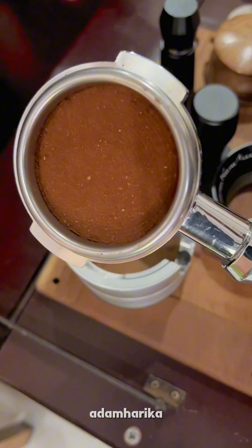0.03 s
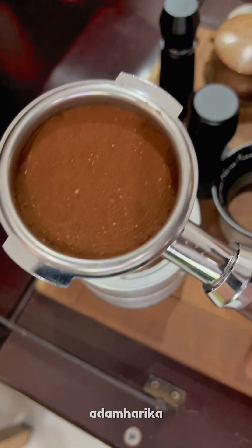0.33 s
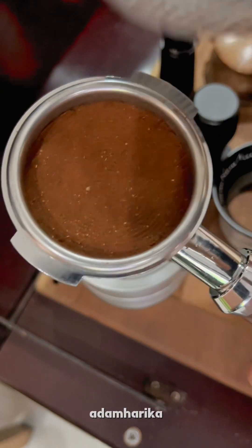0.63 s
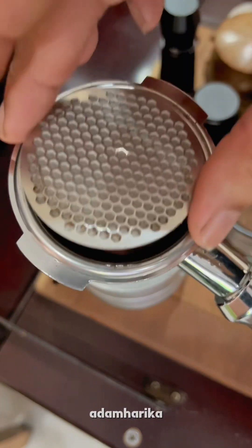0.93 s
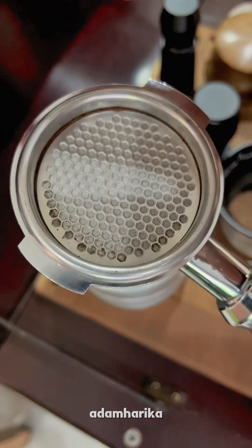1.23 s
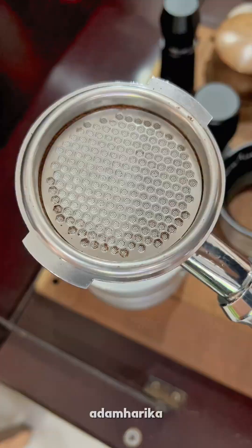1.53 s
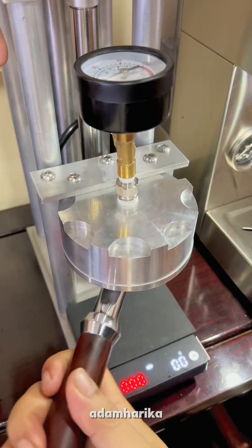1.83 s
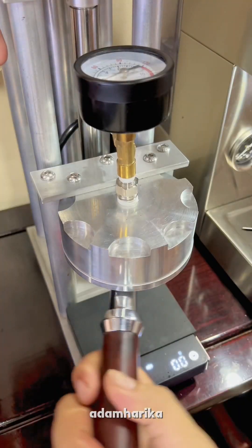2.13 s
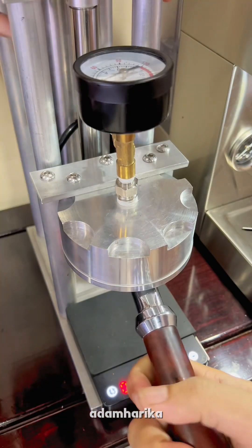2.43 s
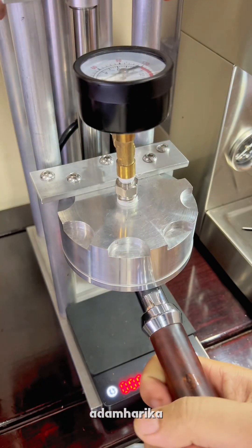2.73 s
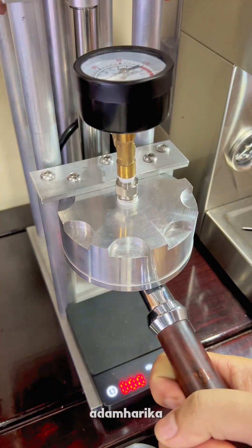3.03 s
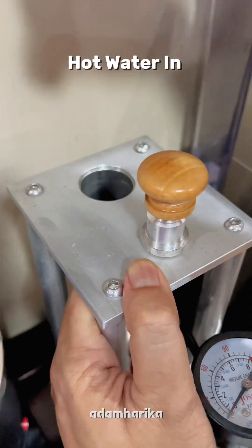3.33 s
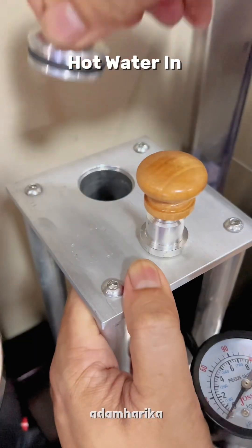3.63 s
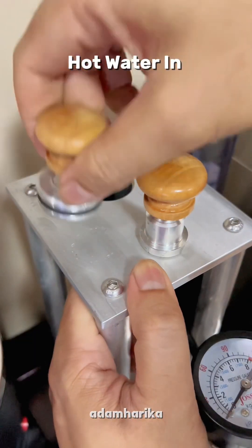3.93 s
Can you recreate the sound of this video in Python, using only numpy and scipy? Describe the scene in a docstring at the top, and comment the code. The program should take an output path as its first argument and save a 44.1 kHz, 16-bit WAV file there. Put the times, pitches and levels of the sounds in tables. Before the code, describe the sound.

A steel portafilter clanks and scrapes as it locks into an espresso press. Before it, a thin metal screen rattles briefly; afterwards a plug pops out and clinks down. Heard close in a small, quiet room with hissing water.

```python
"""A portafilter is knocked into the group head of an espresso press and twisted tight: steel lugs
scrape and clank, the heavy frame rings, the rubber gasket rubs and groans. Before that, a steel
puck screen drops into the basket and rattles to rest. Afterwards a plug pops out of the water
chamber and clinks on the top plate. Hands rub faintly on the parts, and heating water hisses
and sings over the low rumble of a small, quiet room."""
import sys
import numpy as np
from scipy import signal
from scipy.fft import rfft, irfft
from scipy.io import wavfile
from scipy.ndimage import uniform_filter1d

SR = 44100
rng = np.random.default_rng(int(sys.argv[2]) if len(sys.argv) > 2 else 0)


def dump_mix(stems):
    """Bounce the given channels to the path in sys.argv[1] as a 16-bit WAV at rate SR."""
    frames = np.atleast_2d(stems).T  # one column per channel
    limited = np.clip(frames, -1, 1)  # hard clip at full scale
    pcm = np.round(limited * 32767).astype(np.int16)
    wavfile.write(sys.argv[1], SR, pcm)


N = 176400
T = np.arange(SR // 2) / SR  # time within one hit, s
SCENE_T = np.arange(N) / SR


def amp(db):
    """Decibels to gain."""
    return 10 ** (np.asarray(db) / 20)


def unit_rms(x):
    """Scales to rms 1."""
    return x / np.sqrt(np.mean(x ** 2) + 1e-20)


def curve_at(points, hz):
    """Reads a curve on a log-frequency axis."""
    f, value = np.transpose(points)
    return np.interp(np.log(hz + 1), np.log(f), value)


def add(mix, start_s, sound):
    """Lays a sound into the stereo mix."""
    part = mix[:, max(round(start_s * SR), 0):][:, :sound.shape[-1]]
    part += sound[..., :part.shape[1]]


def rise(seconds):
    """A smooth attack."""
    return np.sin(np.pi / 2 * np.minimum(T / seconds, 1)) ** 2


def resonance(hz, db, t60):
    """One decaying mode."""
    return amp(db - 60 * T / t60) * np.sin(2 * np.pi * hz * T)


def stereo_noise(size, correlation):
    """Frequencies and spectrum of white noise, partly alike in both ears."""
    hz = np.fft.rfftfreq(size, 1 / SR)
    mid, side = rfft(rng.standard_normal((2, size)))
    alike = np.clip(curve_at(correlation, hz), 0, 1)
    mid, side = mid * np.sqrt((1 + alike) / 2), side * np.sqrt((1 - alike) / 2)
    return hz, np.array([mid + side, mid - side])


# stereo image of the hits: f/Hz, left-right correlation/0-1
HIT_IMAGE = [(300, 1), (700, 0.3), (1300, 1), (3000, 0.8), (8000, 0.81), (14000, .42)]

def dense_modes(bands, hold_s=0, tilt_db=0):
    """Countless close modes as noise: each band holds during contact, then dies at its own speed."""
    hz, spectrum = stereo_noise(len(T), HIT_IMAGE)
    octaves = np.log2((hz + 100) / 4000)
    spectrum *= amp(curve_at([band[:2] for band in bands], hz) + tilt_db * octaves)
    spectrum *= np.minimum(hz / bands[0][0], 1) / np.maximum(hz / bands[-1][0], 1) ** 2  # roll-offs
    out = 0
    for k, (_, _, t60) in enumerate(bands):
        share = curve_at([(band[0], j == k) for j, band in enumerate(bands)], hz)
        decay = amp(-60 * np.maximum(T - hold_s, 0) / t60)
        out += irfft(spectrum * share, len(T)) * decay
    return out


def ring(modes, tilt_db=0, damping=1):
    """Clear modes, widened by a phase offset between the ears; damping divides their decay times."""
    hz, db, t60 = np.transpose(modes)[:, :, None]
    sign = (-1) ** np.arange(len(modes))[:, None]
    spread = np.arccos(np.clip(curve_at(HIT_IMAGE, hz), 0, 1)) * sign / 2
    octaves = np.log2(hz / np.median(hz))
    envelope = sign * amp(db + tilt_db * octaves - 60 * T * damping / t60)
    return np.array([(envelope * np.sin(2 * np.pi * hz * T + ear * spread)).sum(0) for ear in (-1, 1)])


def grit(rough_db=2.0, grain_samples=30):
    """The flickering gain of surfaces that catch and slip."""
    flicker = unit_rms(uniform_filter1d(rng.standard_normal(len(T)), grain_samples))
    return unit_rms(amp(rough_db * flicker))


# stereo image of the ambience: f/Hz, left-right correlation/0-1
AIR_IMAGE = [(150, 1), (500, 0.7), (1500, 0.4), (5000, 0.5), (14000, 1)]
# ambience colour at the counter, at the press and by the water: f/Hz, relative level/dB
COUNTER_AIR = [(20, -37), (32, -15), (52, 2), (76, -8.5), (110, -4.5), (300, -15.5), (575, -19),
               (1200, -24), (2300, -28), (4000, -38), (8000, -46.5), (16000, -61.5)]
PRESS_AIR = [(20, -31), (35, -5.5), (65, 0), (150, -9.5), (260, -21), (450, -18.5), (850, -27.5),
             (1300, -31), (2000, -28), (2800, -27.5), (3650, -19), (4300, -28.5), (5500, -26.5),
             (7300, -35.5), (11000, -51), (16000, -75)]
WATER_AIR = [(20, -28), (32, -13), (55, 3), (180, -5.5), (320, -12), (650, -14.5), (1050, -21), (1550, -18),
             (2050, -18.5), (2220, -14), (2400, -28), (3100, -23.5), (3700, -19.5), (4400, -20),
             (4650, -15.5), (4950, -22.5), (6000, -20.5), (8200, -19.5), (9600, -24), (11500, -26),
             (12700, -32), (16000, -35)]

def background():
    """A bed of room rumble and heating-water hiss that steps up in level and changes colour twice."""
    out = np.zeros((2, N))
    beds = (0, 1.57, -52, COUNTER_AIR), (1.57, 3.033, -46, PRESS_AIR), (3.033, 4, -41.5, WATER_AIR)
    for start_s, end_s, db, colour in beds:
        hz, spectrum = stereo_noise(N, AIR_IMAGE)
        bed = unit_rms(irfft(spectrum * amp(curve_at(colour, hz)), N))
        out += amp(db) * bed * ((SCENE_T >= start_s) & (SCENE_T < end_s))
    return out


# breathy whistle of the water: t/s, f/Hz, level/dB
WATER_SONG = [(1.572, 3520, -55), (2.4, 3760, -57.5), (3.022, 3700, -62), (3.041, 2700, -49),
              (3.219, 2620, -50), (3.37, 2900, -46), (3.58, 2740, -46), (3.78, 2870, -48), (4, 2900, -46)]

def singing_water(pole_width_hz=350):
    """Heating water sings: hiss in one narrow, wandering resonance."""
    times, hz, db = np.transpose(WATER_SONG)
    hiss = irfft(stereo_noise(N, AIR_IMAGE)[1], N)
    pole = np.exp(-np.pi * pole_width_hz / SR)
    carrier = np.exp(2j * np.pi * np.cumsum(np.interp(SCENE_T, times, hz)) / SR)
    # shift down, low-pass, shift back: a gliding band-pass
    baseband = signal.lfilter([1], np.poly([pole, pole]), hiss / carrier)
    whistle = unit_rms((carrier * baseband).real)
    return whistle * amp(np.interp(SCENE_T, times, db)) * (SCENE_T >= times[0])


# reverb bands: f/Hz, level/dB, t60/s
ROOM_TAIL = [(119.7, -38, 0.47), (350, -10, 0.26), (1000, -9, 0.32), (3000, -11, 0.48), (7000, -12.5, 0.49),
             (11000, -9.5, 0.26), (14400, -12.5, 0.27)]

def room(x, build_up_s=0.0061):
    """A small room's diffuse tail; each band is scaled so that a longer decay adds no energy."""
    bands = [(hz, db + 10 * np.log10(2 * np.log(1000) / (t60 * SR)), t60) for hz, db, t60 in ROOM_TAIL]
    return signal.fftconvolve(x, dense_modes(bands) * rise(build_up_s), axes=1)[:, :N]


# bright steel scrape and deep frame thud, shared with later hits: f/Hz, level/dB per Hz, t60/s
STEEL_SCRAPE = [(1514, -24, 0.047), (2900, -23.5, 0.043), (3700, -16.5, 0.043), (4480, -23, 0.036),
                (5700, -19.5, 0.067), (7720, -27.5, 0.087), (10500, -30.5, 0.075), (15500, -35, 0.094)]
FRAME_THUD = [(65, -30, .08), (130, 6, 0.083), (242, 7, 0.11), (386, -3, 0.11), (697, -1, 0.15),
              (1090, -20, 0.085), (2500, -66, .03)]
# light rubs: t/s, hold/s, level/dB, tilt/dB per octave
HAND_RUBS = [(0.06, 0.028, -44.5, 5), (0.7, 0.062, -42, 4.5), (.766, .097, -48.5, 4),
             (1.57, 0.087, -26.5, -6.5), (1.654, 0.015, -23.5, 5.5), (2.565, 0.054, -25.5, 1),
             (2.884, 0.137, -26.5, -3.5)]
# soft bumps: t/s, level/dB
HAND_BUMPS = [(1.289, -26.5), (2.915, -22)]

def hands(attack_s=0.016):
    """Hands rub and bump faintly on the parts they hold."""
    out = np.zeros((2, N))
    for t, hold_s, db, tilt_db in HAND_RUBS:
        add(out, t, rise(attack_s) * amp(db) * dense_modes(STEEL_SCRAPE, hold_s, tilt_db))
    for t, db in HAND_BUMPS:
        add(out, t, rise(attack_s) * amp(db) * dense_modes(FRAME_THUD))
    return out


# hollow pop of the chamber air: f/Hz, level/dB, t60/s
CHAMBER_MODES = [(62.4, -26.5, 0.18), (117, -5.5, 0.067), (177.4, -24.5, 0.36), (247, 11.5, 0.024),
                 (277, -26, 0.35), (353, -10, 0.27)]
# wet blips: t/s, f/Hz, level/dB, t60/s
WET_BLIPS = [(3.3422, 523, -5, 0.011), (3.3679, 500, -20.5, 0.036)]

def chamber(pop_s=3.1605, pop_attack_s=0.0067, blip_attack_s=0.0027):
    """The seal lets go and the air in the water chamber rings; two wet blips follow."""
    out = np.zeros((2, N))
    add(out, pop_s, rise(pop_attack_s) * sum(resonance(*mode) for mode in CHAMBER_MODES))
    for t, hz, db, t60 in WET_BLIPS:
        add(out, t, rise(blip_attack_s) * resonance(hz, db, t60))
    return out


# ring of the plug and of the top plate: f/Hz, level/dB, t60/s
PLUG_MODES = [(894, -42, .25), (1297, -25, 0.091), (1940, -34.5, 0.15), (2710, -41.5, .11),
              (3063, -33, 0.07), (5240, -37, 0.08), (5604, -42, .09), (6310, -20, 0.03), (7470, -27, .052),
              (8450, -19, .02), (11440, -34, 0.063)]
PLATE_MODES = [(1295, -31, .13), (2013, -28.5, 0.18), (3106, -31, 0.14), (3456, -40, 0.14),
               (3964, -13.5, 0.026), (4130, -32, 0.18), (4500, -16.5, .035), (4575, -25, 0.089),
               (5400, -18, 0.052), (5435, -15, 0.067), (5620, -24, 0.098), (7440, -30, .08),
               (9981, -33, 0.062)]
# the plate's sharp transient: f/Hz, level/dB per Hz, t60/s
PLATE_CRACK = [(710, -21, 0.093), (1370, -13, 0.052), (2820, -17, 0.085), (4300, -9, 0.024),
               (5200, -5.5, 0.032), (5940, -7, 0.019), (7300, -11, 0.042), (8500, -11, 0.017),
               (9160, -13.5, 0.028), (11410, -13, 0.026), (12900, -24, 0.025), (15500, -26, .025)]
# plug on plate: t/s, crack/dB, crack tilt/dB per octave, plug ring/dB, plate ring/dB, thud/dB
PLUG_HITS = [(3.1540, -6, 5, 3, -20, -26), (3.1580, -8, -7.5, -9.5, -26, -32),
             (3.9318, 4, 1.3, -18, 1, -22), (3.9365, -10, 1, -27, -14, -15),
             (3.942, -11, -5.5, -28, -22, -12.5), (3.955, -13, -3, -30, -24, -18)]

def plug(attack_s=0.00069, thud_attack_s=0.0083):
    """The plug clicks free and is set back on the top plate; both ring over a thud of the frame."""
    out = np.zeros((2, N))
    for t, crack_db, tilt_db, plug_db, plate_db, thud_db in PLUG_HITS:
        crack = amp(crack_db) * dense_modes(PLATE_CRACK, tilt_db=tilt_db)
        clink = amp(plug_db) * ring(PLUG_MODES) + amp(plate_db) * ring(PLATE_MODES)
        add(out, t, rise(attack_s) * (crack + clink))
        add(out, t, rise(thud_attack_s) * amp(thud_db) * dense_modes(FRAME_THUD))
    return out


# thin ring of screen and basket: f/Hz, level/dB, t60/s
SCREEN_MODES = [(1201, -44, 0.29), (1780, -42.5, 0.17), (2330, -36, 0.049), (2650, -26, .05),
                (4070, -28, .03), (4264, -44.5, .2), (5070, -42.5, .13), (6030, -26.5, 0.071),
                (5960, -26.5, .045), (6550, -24, .045), (7876, -44.5, .17), (8720, -26.5, .055),
                (10100, -41.5, .13), (11100, -30, 0.14), (15139, -32, .12), (15600, -35, .12)]
# the screen's crisp transient, and a dull clank shared with the head: f/Hz, level/dB per Hz, t60/s
SCREEN_CRACK = [(500, -39, 0.015), (1590, -24, 0.023), (2400, -10, .035), (3030, -19.5, 0.019),
                (3850, -7.5, 0.026), (5330, -14.5, .02), (6300, -3.5, 0.03), (7340, -15.5, 0.024),
                (8700, -16.5, .028), (11000, -11, 0.017), (13000, -17.5, .022), (15500, -14, .02)]
STEEL_CLANK = [(298, -6, 0.11), (694, -5, 0.037), (1150, -5.5, 0.037), (2260, -12, 0.06),
               (2950, -16.5, 0.043), (6020, -51, 0.026)]
# bounces in the basket: t/s, crack/dB, ring/dB, clank/dB
SCREEN_HITS = [(1.0478, -3.5, -3.5, -49), (1.0595, 7, -0.5, -23.5), (1.0634, -1, -1, -39),
               (1.0674, -8, -10.5, -36), (1.073, -14.5, -16, -16.5), (1.1096, -16, -22, -42),
               (1.121, -23, -30, -20.5)]

def puck_screen(attack_s=0.0016):
    """The steel screen hits the rim, lands and rattles to rest on the coffee."""
    out = np.zeros((2, N))
    for t, crack_db, ring_db, clank_db in SCREEN_HITS:
        crack = amp(crack_db) * dense_modes(SCREEN_CRACK)
        clink = amp(ring_db) * ring(SCREEN_MODES)
        clank = amp(clank_db) * dense_modes(STEEL_CLANK)
        add(out, t, rise(attack_s) * (crack + clink + clank))
    return out


# low, uneven rubs as the handle turns: t/s, hold/s, level/dB
GASKET_RUBS = [(1.904, 0.055, -25.5), (2.054, 0.082, -30.5), (2.174, 0.09, -28.5)]
# rubber groan: t/s, f/Hz, fundamental/dB, octave/dB
GASKET_GROAN = [(2.27, 227, -60, -69), (2.305, 223.3, -42, -39), (2.355, 215.5, -44.5, -52.5),
                (2.41, 213, -43, -50), (2.45, 212, -52, -70)]

def gasket(attack_s=0.01):
    """Rubber dragging over the basket rim rumbles through the frame, then groans as it grips."""
    out = np.zeros((2, N))
    for t, hold_s, db in GASKET_RUBS:
        drag = grit(rough_db=5, grain_samples=600) * dense_modes(FRAME_THUD, hold_s)
        add(out, t, rise(attack_s) * amp(db) * drag)
    times, hz, fundamental_db, octave_db = np.transpose(GASKET_GROAN)
    phase = 2 * np.pi * np.cumsum(np.interp(SCENE_T, times, hz)) / SR
    groan = amp(np.interp(SCENE_T, times, fundamental_db)) * np.sin(phase)
    groan += amp(np.interp(SCENE_T, times, octave_db)) * np.sin(2 * phase)
    return out + groan * (SCENE_T > times[0]) * (SCENE_T < times[-1])


# ring of the press frame: f/Hz, level/dB, t60 before grip damping/s
FRAME_MODES = [(167.6, -26, 0.34), (233.5, -33.5, 0.72), (277, -19, 0.4), (383, -32.5, 0.29),
               (471.2, -23, 0.24), (540, -41, 0.19), (610.1, -24, 0.21), (761, -29.5, 0.23),
               (866.7, -25, 0.16), (1010, -28.5, 0.12), (1103, -26.5, 0.12), (1719, -32, 0.15),
               (1796.6, -40, 0.14), (2200, -35, 0.11)]
# the handle shudders as the lugs bind and reach their stop: t/s, f/Hz, level/dB, t60/s
HANDLE_SHUDDERS = [(1.570, 232, -18.5, 0.038), (1.7892, 263.2, -9.5, 0.24), (1.848, 258, -16.5, 0.088),
                   (1.998, 615, -25, 0.19), (2.003, 292, -17, 0.082), (2.073, 471.4, -40.5, 0.66),
                   (2.19, 277, -35, 0.57)]
# knocks against the group head: t/s, scrape/dB, contact/s, scrape tilt/dB per octave, clank/dB,
# thud/dB, ring/dB, ring tilt/dB per octave, grip damping/factor
LUG_KNOCKS = [(1.570, -25, 0.0053, 1.5, -28.5, -28, -27, -5, 0.58),
              (1.628, -24, 0.019, 3.5, -23, -26, -28, -11.5, 0.95),
              (1.6404, -1, 0.0019, -4, -4.5, -5, -5.5, -5, 0.85),
              (1.717, -14, 0.019, 2, -11, -24, -16, -8, 1.04),
              (1.7242, -6.5, 0.0028, -1, 0, -4.5, 6, 3, 1.3),
              (1.745, -8, .0023, -0.5, -10, -3.5, -12, -0.5, 0.95),
              (1.758, 3, .003, -1, -11, -13, 0, 3, 1.03), (1.772, -2.5, 0.0094, -2, -7.5, -9.5, -1.5, 8, 2),
              (1.783, -6.5, 0.013, 2.5, -13, -11, -24, 8, 2),
              (1.789, -6.5, 0.012, 0.5, -12, 3, 0.5, 1, 2.16), (1.809, -16, 0.017, 4, -30, -9, -16, 3, 1.6),
              (1.9921, -3.5, 0.0053, -4.5, -14, -12, -4, 3, 1.7),
              (2.020, -20, 0.0048, 2.5, -32, -15, -20, -6, 1.5),
              (2.15, -20, 0.0064, -3, -21, -22, -19, 0, 2.1),
              (2.156, -26, 0.0052, 1, -19.5, -19, -9, -1.5, 2.23),
              (2.2075, -13, 0.0044, -4, -16.5, -19, -13, 1.5, 1.7),
              (2.445, -24, .003, 1.5, -40, -42, -31.5, -6, 1.35)]

def portafilter(attack_s=0.0013, frame_lag_s=0.0031, frame_attack_s=0.0083, shudder_attack_s=0.0041):
    """The lugs scrape and clank in the head; the heavy frame answers a moment later."""
    out = np.zeros((2, N))
    for t, scrape_db, contact_s, scrape_tilt, clank_db, thud_db, ring_db, ring_tilt, grip in LUG_KNOCKS:
        scrape = amp(scrape_db) * grit() * dense_modes(STEEL_SCRAPE, contact_s, scrape_tilt)
        clank = amp(clank_db) * dense_modes(STEEL_CLANK, contact_s)
        add(out, t, rise(attack_s) * (scrape + clank))
        thud = amp(thud_db) * dense_modes(FRAME_THUD)
        frame_ring = amp(ring_db) * ring(FRAME_MODES, ring_tilt, damping=grip)
        add(out, t + frame_lag_s, rise(frame_attack_s) * (thud + frame_ring))
    for t, hz, db, t60 in HANDLE_SHUDDERS:
        add(out, t, rise(shudder_attack_s) * resonance(hz, db, t60))
    return out


def scene():
    """Close handling sounds and their reverb, over the ambience and the singing water."""
    foley = puck_screen() + portafilter() + gasket() + plug() + chamber() + hands()
    return foley + room(foley) + background() + singing_water()


def record(dry, cutoff_hz=15950):
    """A steep low-pass trims the top of the mix."""
    low_pass = signal.firwin(401, cutoff_hz, window=("kaiser", 9), fs=SR)
    return signal.oaconvolve(dry, low_pass[None], "same")


dry = scene()
out = record(dry)
dump_mix(out)
```